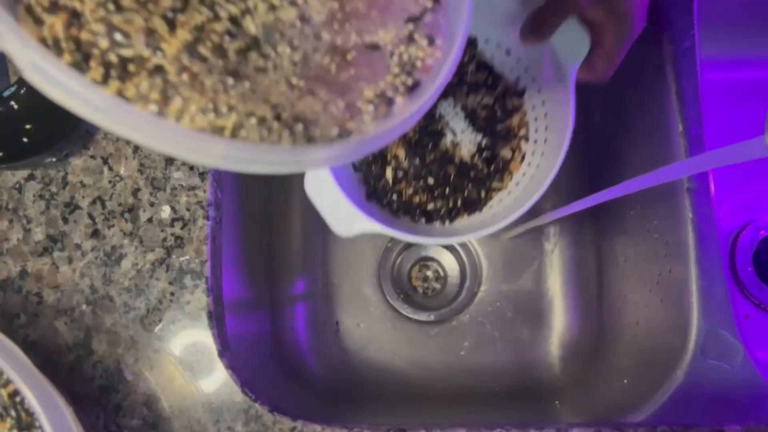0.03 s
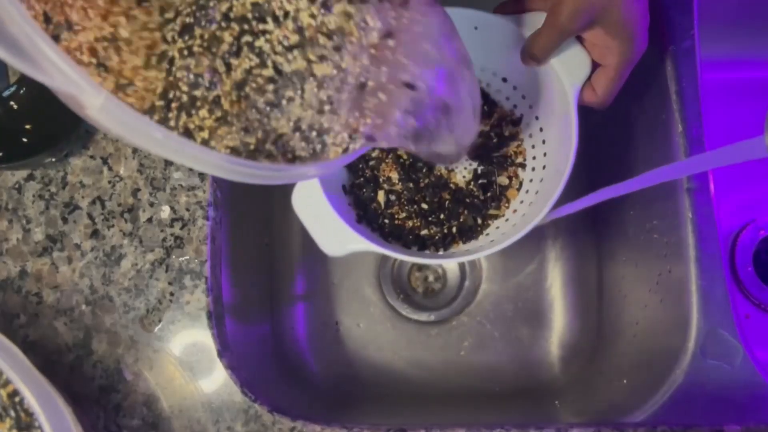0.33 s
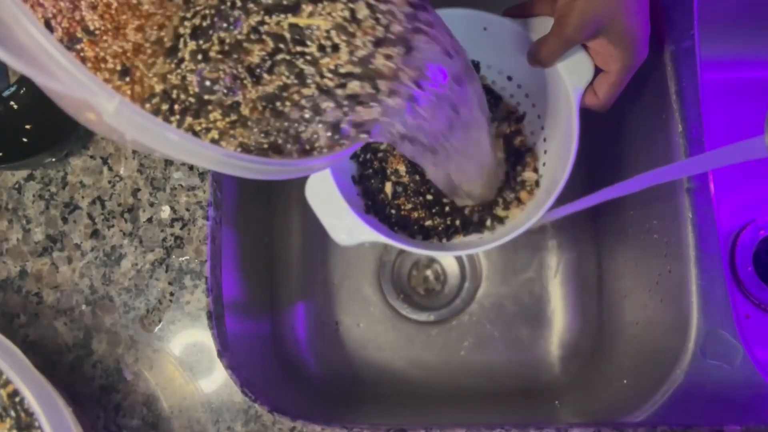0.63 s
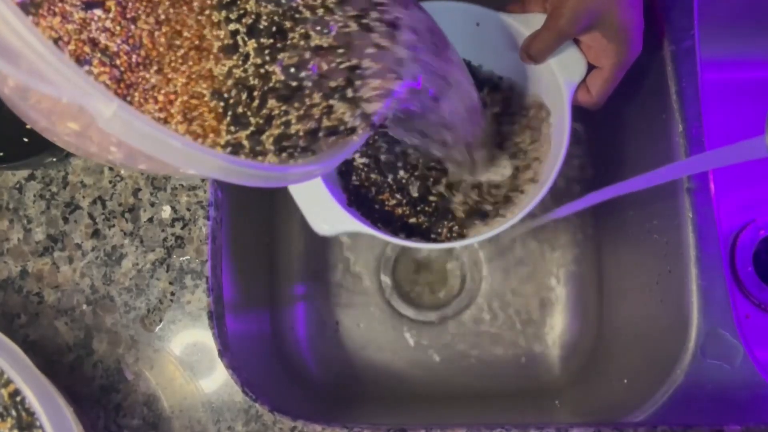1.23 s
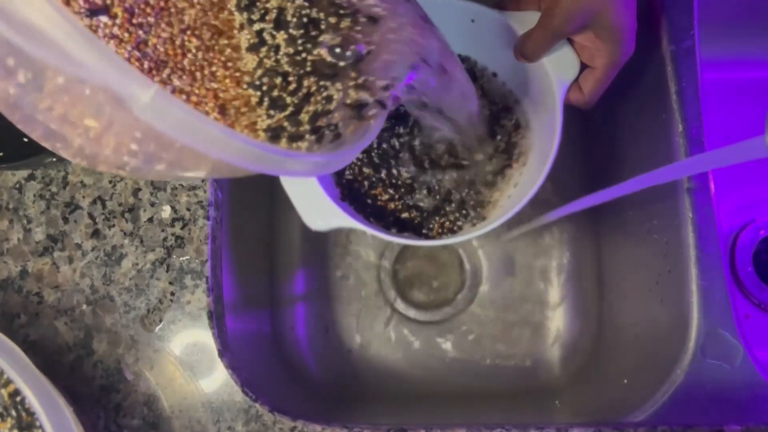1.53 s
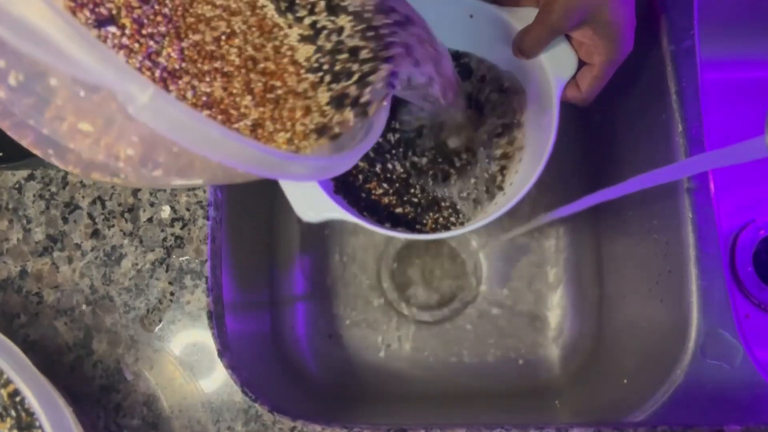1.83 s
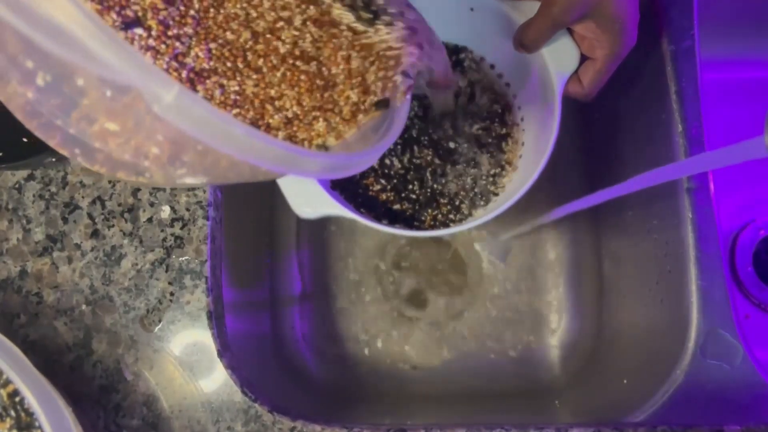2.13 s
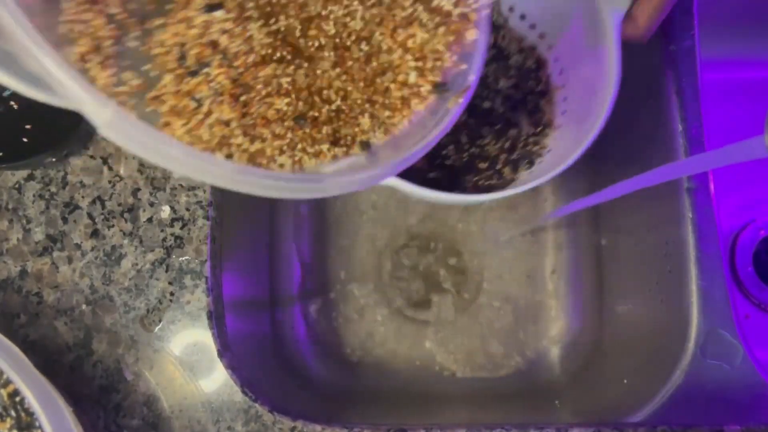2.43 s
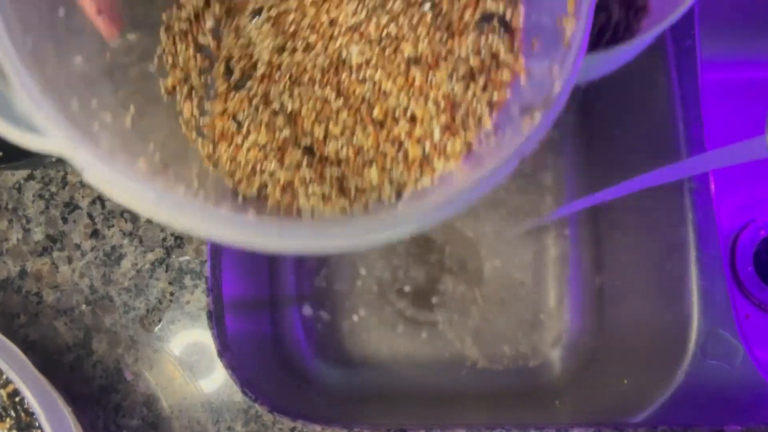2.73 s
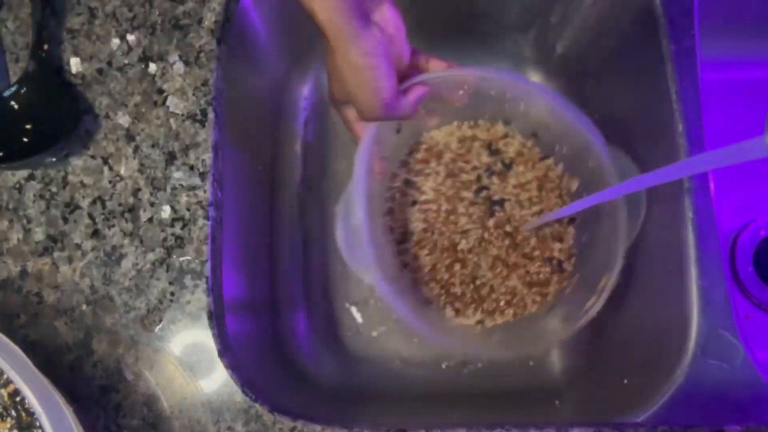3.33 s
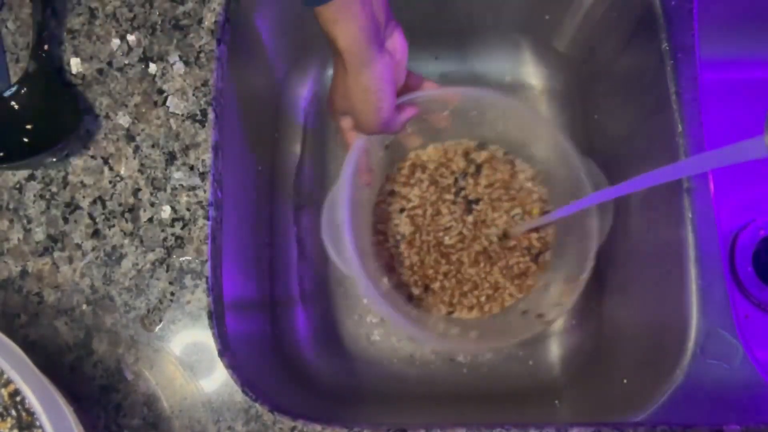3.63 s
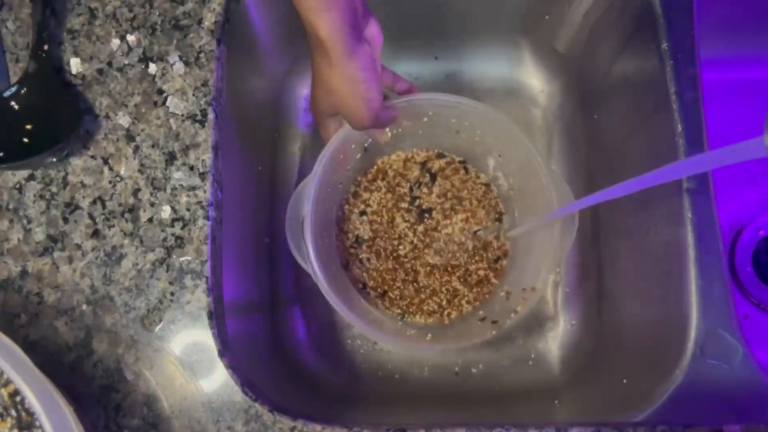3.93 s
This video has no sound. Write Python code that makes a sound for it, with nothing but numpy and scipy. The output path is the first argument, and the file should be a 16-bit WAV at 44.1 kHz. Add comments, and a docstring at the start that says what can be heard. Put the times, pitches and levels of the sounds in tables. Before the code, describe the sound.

A splashing pour of water and seeds over a metal sink, then trickling and light knocks.

```python
"""A kitchen, just above a steel sink, heard through two closely spaced microphone ports.
A thin tap spits on the bare steel. Water and seeds gush from a plastic tub into a colander; the
runoff bubbles underneath and drums on the sink floor. The pour dwindles, the tub swings under
the tap and is set down with two knocks and a small shove that leave the basin ringing."""
import sys
import numpy as np
from scipy import signal
from scipy.fft import rfft, irfft
from scipy.io import wavfile

SR = 44100
rng = np.random.default_rng(int(sys.argv[2]) if len(sys.argv) > 2 else 0)


def to_wav(sig):
    """Store sig (one row per channel, or 1-D mono) as 16-bit WAV at the path in sys.argv[1].

    Samples outside -1..1 are clipped; the rate is SR.
    """
    pcm = np.clip(np.atleast_2d(sig), -1, 1) * 32767
    pcm = np.round(pcm).astype(np.int16)
    wavfile.write(sys.argv[1], SR, pcm.T)  # frames by channels


N = 176400

# Spectra of the water, each (frequency [Hz], relative level [dB])
TRICKLE_SPECTRUM = [(100, -20), (600, -1), (1900, -1.5), (4400, 1.5), (6500, -4.5), (9500, -4.5),
                    (11200, -13), (15500, -11)]  # the tap stream falling into water
GUSH_SPECTRUM = [(500, -44), (1500, -12.5), (2400, -5.5), (3550, 0), (4500, -0.5), (6000, -6.5),
                 (11000, -12)]  # seeds and water hitting the colander
DRAIN_SPECTRUM = [(100, -51.5), (480, -2), (750, -9), (1050, 1.5), (1500, -2.5), (1950, 3), (2400, -3.5),
                  (3300, -2.5), (6000, -18)]  # runoff landing on steel
SPRAY_SPECTRUM = [(2500, -27), (4300, -3), (5600, 7), (8000, -7.5), (9800, 3), (11200, -23), (15500, -33)]  # fine droplets
# The tub meeting the basin (time [s], ring [dB], push length [s], clack [dB], tick [dB])
TUB_CONTACTS = [(3.356, -13.5, 0.00015, -18, -22.5), (3.522, -42, .004, -40, -19),
                (3.53, -10, 0.00052, -20.5, -41), (3.853, -38, 0.0026, -33, -22.5),
                (3.893, -24, 0.0035, -34, -27), (3.923, -34, 0.0053, -46, -16)]


def undb(db):
    """Decibels to gain."""
    return 10 ** (np.asarray(db) / 20)


def unit(x):
    """Scale to rms 1."""
    return x / np.sqrt(np.mean(x ** 2))


def clock():
    """Time of each sample in seconds."""
    return np.arange(N) / SR


def fader(table, column=1):
    """Gain along one dB column of a time table."""
    rows = np.array(table)
    return undb(np.interp(clock(), rows[:, 0], rows[:, column]))


def add(out, start, x):
    """Mix a short sound in at a time."""
    i = int(np.clip(start * SR, 0, N - 1))
    out[i:i + len(x)] += x[:N - i]


def colour(x, spectrum, size=4096):
    """Minimum-phase filter through (frequency [Hz], level [dB]) points; white noise keeps its power."""
    hz, db = np.array(spectrum).T
    bin_hz = np.arange(size + 1) * SR / (2 * size)
    gain = unit(undb(np.interp(np.log(bin_hz + 1), np.log(hz), db)))
    cepstrum = irfft(np.log(gain))
    cepstrum[1:size] *= 2
    cepstrum[size + 1:] = 0
    response = irfft(np.exp(rfft(cepstrum)))[None, :size]
    return signal.oaconvolve(np.atleast_2d(x), response, axes=1)[:, :N]


def wander(rate):
    """A drift of rms 1 through `rate` random values a second."""
    return unit(np.interp(clock() * rate, np.arange(8192), rng.standard_normal(8192)))


def impacts(rate, spread_db):
    """Randomly timed clicks of scattered size, about `rate` a second."""
    chance, size = rng.random(N), rng.standard_normal(N)
    return unit((chance < rate / SR) * rng.choice([-1, 1], N) * undb(spread_db * np.clip(size, -2, 2)))


def patter(rate, spread_db, decay_s):
    """Randomly timed droplets, each a tiny burst of noise."""
    energy = signal.lfilter([1], [1, -np.exp(-2 / (decay_s * SR))], impacts(rate, spread_db) ** 2)
    return unit(np.sqrt(energy) * rng.standard_normal(N))


def scatter(x):
    """Pan each sample at random, so every click comes from its own side."""
    return x * (1 + .33 * rng.standard_normal(N) * np.array([[1], [-1]]))


def bursts(times, levels_db, decay_s, spectrum):
    """Short coloured bursts of noise that swell quickly and die away."""
    envelope, age = np.zeros(N), clock()[:SR // 2]
    for start, db in zip(times, levels_db):
        add(envelope, start, undb(db) * np.exp(-age / decay_s) * (1 - np.exp(-20 * age / decay_s)))
    return colour(rng.standard_normal(N) * envelope, spectrum)


def bubble(hz, cycles, glide):
    """A damped tone that rises as the bubble nears the surface."""
    samples = cycles * SR / hz
    age = np.arange(int(samples)) / samples
    return np.sin(2 * np.pi * cycles * (age + glide * age ** 2 / 2)) * np.exp(-np.log(100) * age)


def bubbles(low_hz, high_hz, cycles, spread_db, count):
    """A swarm of bubbles of many sizes."""
    out = np.zeros(N)
    for (when, pitch, life), loud in zip(rng.random((count, 3)), rng.standard_normal(count)):
        tone = bubble(low_hz * (high_hz / low_hz) ** pitch, cycles * (.5 + life), glide=0.079)
        add(out, when * N / SR, undb(spread_db * min(loud, np.sqrt(2))) * tone)
    return unit(out)


def basin(force, off_centre=False):
    """The steel sink rings when struck; its low modes take longest to build."""
    # Modes of the basin (frequency [Hz], struck off centre [dB], struck flat [dB], t60 [s])
    modes = [(81, -25, -15, 0.35), (127, -13, -4, 0.11), (185, 6.5, 1.5, 0.073), (217.5, 6.5, -0.5, 0.27),
             (231.8, -2.5, -5, 0.62), (264, -3, -5, 0.43), (289.3, 8, 5.5, 0.099), (360, -12, -8, 0.15),
             (489, -5.5, -11.5, 0.44), (538, -10, -16, 0.47), (631, -9, -7.5, 0.1), (886, -5, -7, 0.11),
             (1141, -25, -7.5, 0.079), (1340, -9.5, -22, .11)]
    t, ring, rise_cycles = clock()[:SR // 2], 0, 0.44
    for hz, off_centre_db, flat_db, t60 in modes:
        envelope = (1 - np.exp(-hz * t / rise_cycles)) * np.exp(-np.log(1000) * t / t60)
        ring += undb(off_centre_db if off_centre else flat_db) * np.sin(2 * np.pi * hz * t) * envelope
    return signal.oaconvolve(force, ring)[:N]


def room_tone():
    """The kitchen's steady low rumble."""
    spectrum = [(20, -18), (52, -4.5), (160, -9), (400, -17.5), (15000, -94)]
    return undb(-44) * colour(rng.standard_normal(N), spectrum)


def tap_on_steel():
    """The thin stream spits and spatters on the bare sink floor, fading as the pour begins."""
    # The loudest spits (time [s], relative level [dB])
    spits = [(0.0004, -5), (0.0226, -8.5), (0.041, -13), (0.0638, -12), (0.0905, -16), (0.1213, -3.5),
             (0.1395, -8), (0.195, -10.5), (0.2162, -9.5), (0.227, -5.5), (0.2856, -9), (0.31, -18),
             (0.3283, -12)]
    # Drops bursting on steel (frequency [Hz], relative level [dB])
    spectrum = [(100, -36), (500, -17), (1100, -41), (2700, -20), (3700, -2), (4300, -6.5), (5600, 1.5),
                (7900, -2), (9800, -2), (11200, -15), (15500, -9.5)]
    times, spit_db = np.array(spits).T
    drops = patter(rate=720, spread_db=2.5, decay_s=0.0013)
    fade = np.clip((0.69 - clock()) / 0.26, 0, 1)
    spatter = undb(-29.5) * colour(scatter(drops), spectrum) + undb(-50) * unit(basin(drops))
    return fade * spatter + bursts(times, spit_db - 7, 0.0033, spectrum)


def tap_trickle():
    """The tap trickles and bubbles into water: first the pool in the sink, then the tub of wet seeds."""
    # Strength of the trickle (time [s], level [dB])
    levels = [(.3, -39.5), (2.7, -41), (3.22, -37.5), (3.28, -41), (3.36, -33), (3.68, -34), (3.77, -31.5),
              (4.0, -32.5)]
    drops = undb(1.1 * wander(60)) * impacts(rate=2000, spread_db=0.5)
    trickle = colour(scatter(drops), TRICKLE_SPECTRUM)
    trickle += undb(-10.5) * bubbles(1408, 5690, cycles=110, spread_db=15, count=900)
    resting = np.clip((clock() - TUB_CONTACTS[2][0]) / 0.051, 0, 1)  # the tub lies flat on the steel
    drum = undb(-33) * unit(basin(impacts(rate=300, spread_db=3)))
    return trickle * fader(levels) + resting * drum


def gulps():
    """A few air pockets close, each with a rising note."""
    # The loudest air pockets (time [s], starting pitch [Hz], level [dB])
    pockets = [(0.231, 550, -23), (1.262, 1530, -16), (1.414, 1416, -13.5), (2.51, 600, -29)]
    out = np.zeros(N)
    for start, hz, db in pockets:
        add(out, start, undb(db) * bubble(hz, cycles=29, glide=0.18))
    return out


def pour():
    """A surging gush of seeds and water; the runoff patters, bubbles and drums on the steel."""
    # Balance of the pour (time [s], drumming [dB], runoff [dB], gush [dB], fine spray [dB])
    flow = [(.39, -41, -32.5, -26, -33.5), (.58, -35.5, -31, -27, -27.5), (.8, -35.5, -29.5, -22.5, -30.5),
            (1.15, -35, -26, -23, -29.5), (1.38, -36.5, -29, -27.5, -29.5), (1.72, -34.5, -29, -27.5, -31),
            (1.95, -36.5, -31, -25.5, -31.5), (2.4, -32.5, -33, -31, -32.5), (2.62, -37, -38.5, -39.5, -33),
            (2.76, -35.5, -36.5, -38, -43.5), (3.12, -48, -42, -50, -47.5)]
    start_s, rise_s, stop_s, fall_s = 0.34, 0.035, 3.104, 0.3
    gate = np.clip((clock() - start_s) / rise_s, 0, 1) * np.clip(1 - (clock() - stop_s) / fall_s, 0, 1)
    surge = unit(undb(1.78 * wander(34.85) + 0.95 * wander(220)))
    gush = undb(-0.5) * colour(scatter(surge * impacts(rate=5000, spread_db=3)), GUSH_SPECTRUM)
    gush += undb(-6) * bubbles(2955, 5035, cycles=25, spread_db=9, count=1000)
    spray = colour(scatter(patter(rate=900, spread_db=5, decay_s=.0006)), SPRAY_SPECTRUM)
    spray += undb(2.5) * bubbles(4850, 10240, cycles=24, spread_db=2, count=900)
    runoff = colour(scatter(surge * impacts(rate=2200, spread_db=3)), DRAIN_SPECTRUM)
    runoff += undb(-9) * bubbles(1155, 2306, cycles=66, spread_db=8, count=420) + gurgle()
    drops = surge * impacts(rate=1000, spread_db=-0.5)
    thuds = colour(drops, [(40, -15), (100, -7.5), (200, -2.5), (290, 7),
                           (400, -21), (900, -13.5), (3000, -9)])
    drum = undb(1) * unit(unit(basin(drops)) + undb(3) * thuds)
    return gate * (drum * fader(flow, 1) + runoff * fader(flow, 2)
                   + gush * fader(flow, 3) + spray * fader(flow, 4))


def gurgle():
    """Runoff sounds the hollow under the colander; each resonance swells and fades on its own."""
    # Resonances between colander and sink (frequency [Hz], relative level [dB])
    resonances = [(1369, -16.5), (1500, -8), (1623, -12), (1895, -11), (2127, -16.5), (2225, -20),
                  (3640, -9.5)]
    t, out, t60 = clock()[:SR // 4], 0, .08
    for hz, db in resonances:
        ring = np.sin(2 * np.pi * hz * t) * np.exp(-np.log(1000) * t / t60)
        churn = undb(2 * wander(15)) * rng.standard_normal(N)
        out += undb(db) * unit(signal.oaconvolve(churn, ring)[:N])
    return out


def seed_clumps():
    """Lumps of wet seed slap into the colander and throw up spray."""
    # Clumps landing (time [s], relative treble level [dB], midrange level [dB])
    landings = [(.367, -17, -27.5), (0.377, -8, -20), (0.847, -9.5, -46), (1.124, -9, -16.5),
                (1.265, -17, -15), (2.253, -11.5, -49), (2.368, -10.5, -48), (2.605, -12, -42),
                (2.652, -14, -24)]
    times, treble_db, mid_db = np.array(landings).T
    hit = bursts(times, treble_db - 8, 0.0067, GUSH_SPECTRUM)
    slap = bursts(times, mid_db, 0.0081, DRAIN_SPECTRUM)
    splash = bursts(times, treble_db - 6, 0.0035, SPRAY_SPECTRUM)
    return hit + slap + splash


def tap_on_rim():
    """The tub's rim crosses the stream with a tick and a short splash."""
    # Water hitting the plastic rim (frequency [Hz], relative level [dB])
    spectrum = [(500, -24), (2900, 4), (4200, -3.5), (15000, -12)]
    crossing_s = 3.182
    splash = bursts([crossing_s], [-23.5], 0.032, spectrum)
    tick = bursts([crossing_s], [-11], 0.00027, spectrum)
    return splash + tick


def tub_set_down():
    """The tub lands on its edge, then flat, and is shoved: plastic clacks and the basin booms."""
    # The tub's foot skidding on the steel (time [s], level [dB])
    skids = [(3.890, -25), (3.901, -21)]
    # Plastic scraping and plastic struck, each (frequency [Hz], relative level [dB])
    scrape_spectrum = [(400, -10), (1850, -2), (2700, -10), (9000, -38)]
    clack_spectrum = [(150, -3), (700, 1), (1150, 1.5), (2100, -6), (3000, -29), (15000, -38)]
    times, ring_db, push_s, clack_db, tick_db = np.array(TUB_CONTACTS).T
    edge, flat = np.zeros((2, N))
    t, ring_lag_s = clock()[:SR // 4], 0.00398
    for start, db, length in zip(times, ring_db, push_s):
        push = np.sin(np.pi * np.minimum(t / length, 1))  # a longer push sounds duller
        add(edge if start == times[0] else flat, start + ring_lag_s, undb(db) * push / push.sum())
    shove_thud = bursts([times[4]], [-30], 0.096, [(40, -34), (100, 12), (1500, -68)])
    boom = basin(edge, off_centre=True) + basin(flat) + shove_thud
    scrape = bursts(*np.array(skids).T, 0.0071, scrape_spectrum)
    clacks = bursts(times, clack_db, 0.022, clack_spectrum)
    ticks = bursts(times, tick_db, 0.0054, TRICKLE_SPECTRUM)
    return boom + scrape + clacks + ticks


def microphone_ports(sound):
    """Direct sound reaches the two ports at equal level, drifting apart in phase in the treble."""
    # Left port against right (frequency [Hz], phase lead [rad])
    port_phase = [(0, 0), (3900, -.1), (6000, -1.6), (7900, -3.14), (11100, -6.2), (12400, -6.35),
                  (15000, -9.4)]
    lead = np.interp(np.arange(N + 1) * SR / (2 * N), *np.array(port_phase).T)
    return irfft(rfft(sound, 2 * N) * np.exp(1j * np.array([lead, -lead]) / 2))[:, :N]


def reflections(t60, apart_hz):
    """A dense decay for each port, alike in the bass and unrelated in the treble."""
    t = clock()[:SR // 2]
    mid, side = rng.standard_normal((2, len(t))) * np.exp(-np.log(1000) * t / t60) * (t > .001)
    side = signal.sosfilt(signal.butter(1, apart_hz, "high", fs=SR, output="sos"), side)
    pair = signal.sosfilt(signal.butter(2, 450, "high", fs=SR, output="sos"), [mid + side, mid - side])
    return unit(pair) / np.sqrt(len(t))


def scene():
    """Water and tub, close up and by way of the basin walls and the kitchen, over room tone."""
    sources = (pour() + seed_clumps() + gulps()
               + tap_on_steel() + tap_on_rim() + tap_trickle() + tub_set_down())
    direct = microphone_ports(sources)
    basin_walls = undb(-12) * reflections(t60=0.13, apart_hz=970)
    kitchen = undb(-17) * reflections(t60=0.11, apart_hz=600)
    return direct + signal.fftconvolve(direct, basin_walls + kitchen, axes=1)[:, :N] + room_tone()


def record(dry):
    """The recorder thins the deepest bass, rounds the loudest peaks and cuts the top."""
    rounded = np.tanh(signal.sosfilt(signal.butter(2, 30, "high", fs=SR, output="sos"), dry))
    return signal.sosfilt(signal.ellip(10, .2, 80, 15200, fs=SR, output="sos"), rounded)


dry = scene()
out = record(dry)
to_wav(out)
```